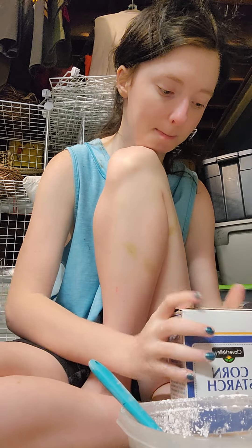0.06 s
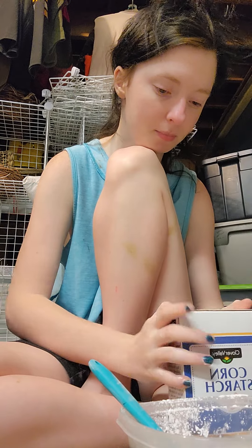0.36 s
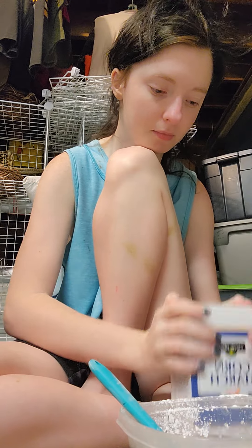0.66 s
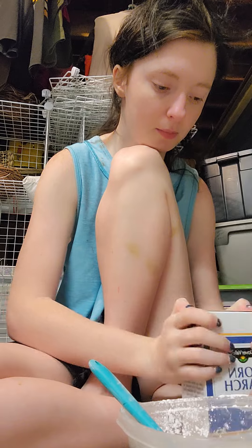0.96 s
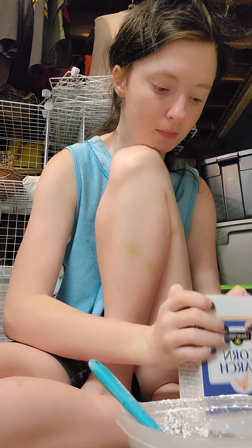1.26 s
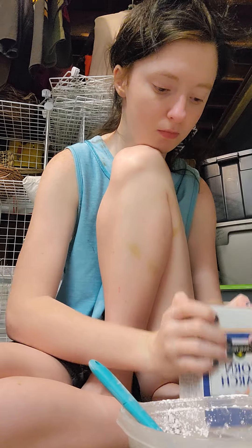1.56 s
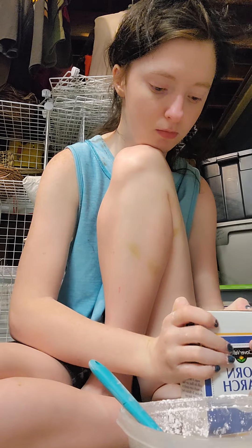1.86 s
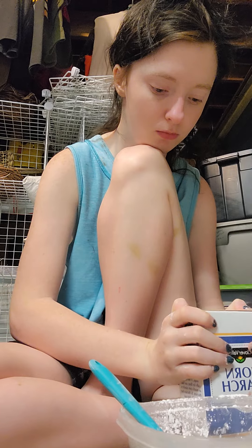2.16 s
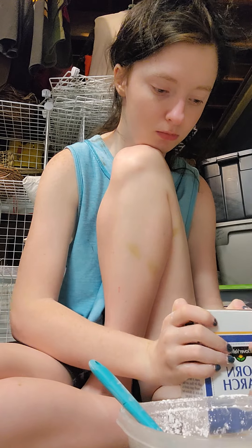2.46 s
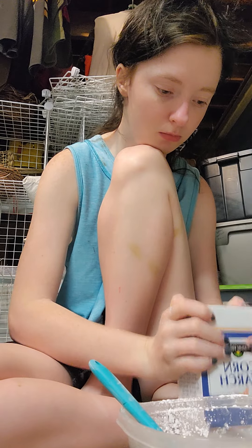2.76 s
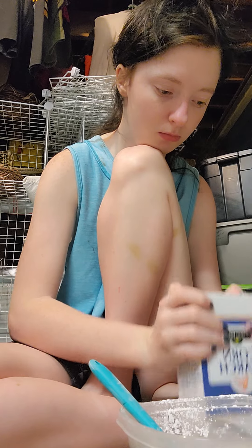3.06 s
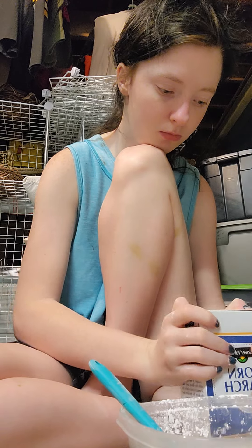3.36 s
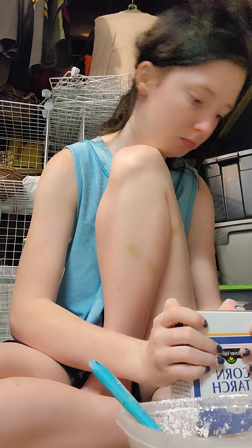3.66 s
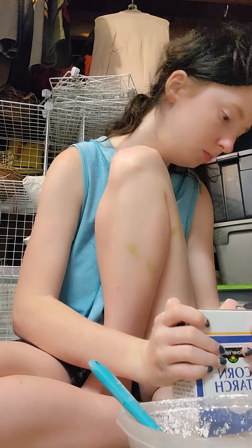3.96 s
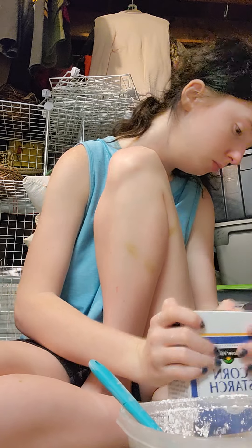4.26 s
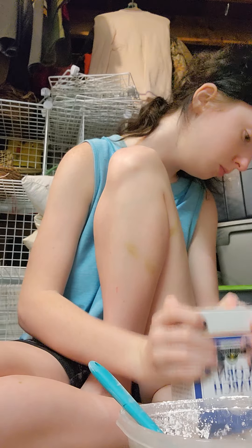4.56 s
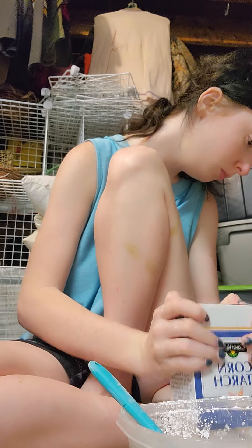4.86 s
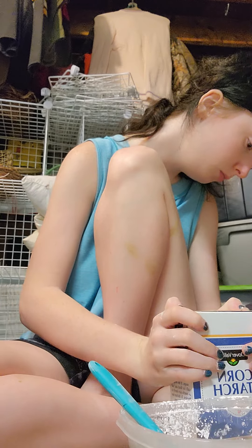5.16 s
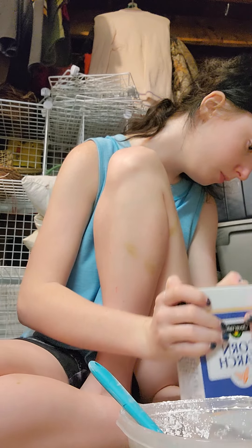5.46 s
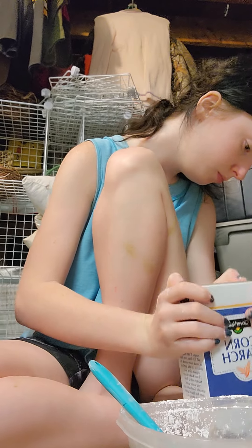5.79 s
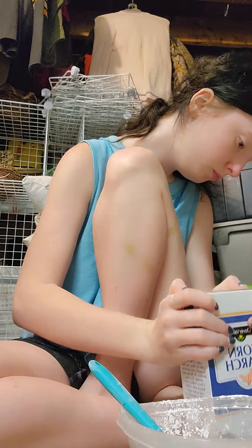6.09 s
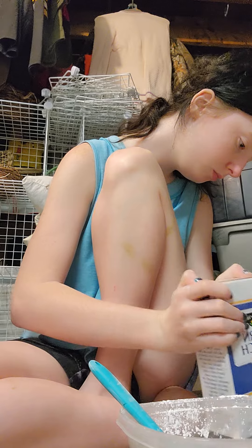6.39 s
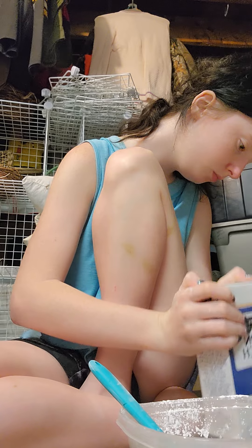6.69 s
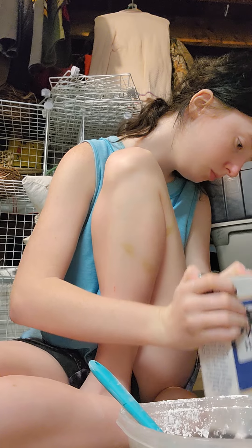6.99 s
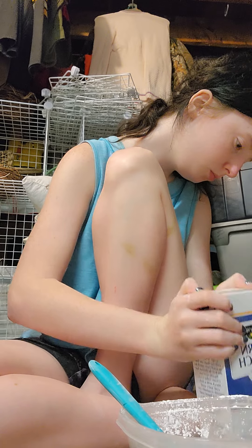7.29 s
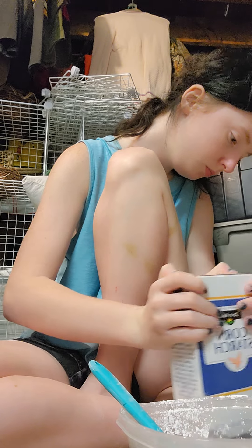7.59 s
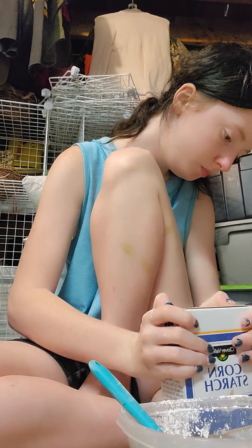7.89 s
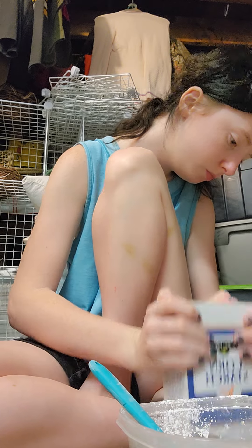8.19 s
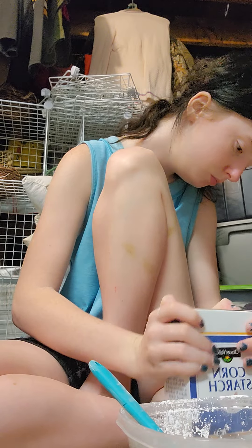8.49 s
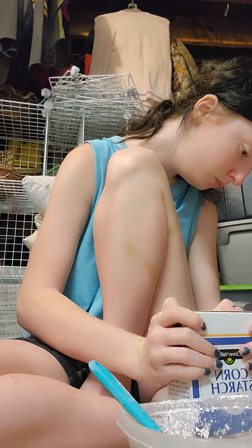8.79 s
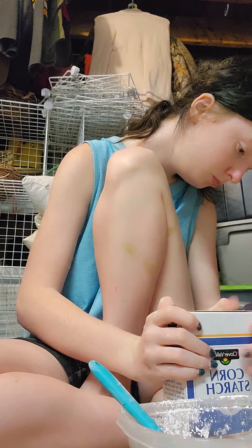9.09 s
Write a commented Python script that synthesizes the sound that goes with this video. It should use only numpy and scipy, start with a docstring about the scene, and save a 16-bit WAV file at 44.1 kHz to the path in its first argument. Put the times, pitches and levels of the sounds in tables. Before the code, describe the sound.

Close to the microphone in a small, dry room, cornstarch hisses as it is scraped in a plastic tub. The tub clacks once and a spatula squeaks faintly twice. Then the tub is knocked about a dozen times onto a cardboard box, each hit a dull thump with a hollow plastic ring and a small crunch. Soft powder slides and crumb taps follow, then four more knocks, over a low rumble.

```python
"""In a small, dry room with a low rumble, a plastic tub of cornstarch is handled close to a phone.
It clacks once on its own, then is knocked again and again onto the mouth of a cardboard box.
These knocks thump the packed box, ring the tub and crunch the powder. Powder hisses in the tub as it
is scraped, spills or slides back. Crumbs drop and tap the plastic; a spatula squeaks faintly twice."""
import sys
import numpy as np
from scipy import signal
from scipy.fft import rfft, irfft
from scipy.io import wavfile
from scipy.ndimage import uniform_filter1d

SR = 44100
rng = np.random.default_rng(int(sys.argv[2]) if len(sys.argv) > 2 else 0)


def persist_wave(psi):
    """Save psi, clipped to +-1, as 16-bit WAV."""
    counts = np.round(np.clip(psi, -1, 1) * 32767).astype(np.int16)
    wavfile.write(sys.argv[1], SR, np.atleast_2d(counts).T)


N = 403074

# Tone curves say how strong a sound is from bass to treble. Columns: pitch_hz, level_db
AIR_TONE = [(15, -39.5), (25, -15.5), (61, -0.5), (99, 0.5), (190, -11.5), (256, -19.5), (531, -25.5),
            (734, -35), (863, -32), (1130, -38.5), (3820, -39), (7310, -47), (9840, -56.5), (14800, -48.5),
            (16000, -57)]  # the room's rumble and thin hiss
SLIDE_TONE = [(500, -7.5), (1100, -8), (1550, -6), (1800, 0), (2200, 0), (2900, 4.5), (3750, 2),
              (4300, -5.5), (5000, 2), (8000, -5), (10000, -19), (13500, -12.5), (16000, -15.5)]  # powder sliding on plastic
HOLLOW_TONE = [(120, -24.5), (300, 0), (520, 2.5), (750, 1.5), (950, -5), (1300, -16), (3000, -45.5)]  # the hollow sound of the tub wall and the box flaps
CRACKLE_TONE = [(300, -15), (1000, -14), (2200, 3), (3700, 0.5), (5500, 0), (7500, -3), (10000, -18),
                (13500, -13.5), (16000, -13.5)]  # powder crumbling and settling
GRAZE_TONE = [(400, -6.5), (1000, -1.5), (2000, -0.5), (3200, -3.5), (6000, -14), (10000, -28.5),
              (16000, -29)]  # the tub brushing the flaps
CRUNCH_TONE = [(300, -12.5), (900, 11.5), (1300, -8.5), (2300, 3), (3500, 2.5), (5200, -2), (7200, -10),
               (9500, -31.5), (11000, -32.5), (13500, -32), (16000, -32.5)]  # powder crushed by a blow
ECHO_TONE = [(60, -18.5), (200, -5), (700, -4), (2500, -.5), (7000, -.5), (16000, 2)]  # the room's echo
# How the two microphones differ. Columns: pitch_hz, left_minus_right_db
MIC_BALANCE = [(100, 0), (200, -2), (400, -2), (1000, -2.5), (2200, 1), (4200, -1.5), (8000, -5.5),
               (15000, -2.5)]

# The notes a part rings with when hit; each drops 60 dB in fade_s. Columns: pitch_hz, level_db, fade_s
BOX_NOTES = [(78, 0, 0.12), (89.5, -12, 0.28)]  # the filled box bouncing as a whole
PANEL_NOTES = [(177, -2, 0.078), (204, -6, 0.16), (185, -14.5, .15), (243, -5, .08)]  # its cardboard panels
BASE_NOTES = [(313.8, 1, .07), (377.6, 1.5, 0.048), (404, -2, 0.078), (503.7, -2, 0.067)]  # the tub's base
WALL_NOTES = [(543.1, -0.5, 0.081), (635, 3.5, 0.053), (735, -3.5, 0.036), (850, -9.5, 0.04),
              (906.6, -1.5, 0.047), (1123, -10.5, .025)]  # its thin walls
RIM_NOTES = [(1250, -3, .022), (1470, 1, .024), (1750, -4, .018), (1950, 1.5, .018), (2230, 3, .024),
             (2400, -2, .018), (2710, -3, .022), (3100, -6, .016), (3460, -3, .018), (3850, -2, .017),
             (4685, -3.5, .018), (5400, -10, .018), (6200, -13, .015)]  # its stiff rim
# The space inside the tub sings faintly when rubbed. Columns: pitch_hz, width_hz, level_db
CAVITY_NOTES = [(1510, 240, -26.5), (2140, 320, -25), (3870, 150, -22), (4700, 300, -28)]

# Events follow. Their levels are starting points that the functions shift for each part of the sound.
# Scrapes, spills and slides of powder in the tub. Columns: middle_s, hiss_db, wall_db, length_s
POWDER_MOVES = [(0.025, -41.5, -60, 0.063), (0.275, -53.5, -59.5, .19), (0.4375, -44.5, -57.5, .11),
                (0.547, -51, -61.5, .15), (0.748, -55.5, -63.5, 0.23), (0.918, -55, -66, .07),
                (1.108, -40.5, -49, 0.064), (1.257, -60, -63.5, 0.065), (1.351, -59.5, -63.5, .1),
                (3.536, -45.5, -56.5, .07), (5.491, -56.5, -66, .11), (5.883, -65.5, -77.5, 0.19),
                (6.461, -62, -81, 0.18), (6.649, -57.5, -74.5, 0.23), (6.804, -57.5, -84, .095),
                (7.062, -59, -73, 0.093), (7.317, -50.5, -70.5, 0.13)]
# Squeaks of the spatula's blade on bare plastic. Columns: middle_s, level_db, length_s
SQUEAKS = [(0.558, -65.5, .15), (0.786, -61.5, 0.035)]
# Crumbs and light touches. Columns: contact_s, crackle_db, wall_db, fade_s
CRUMBS = [(0.101, -41, -67, 0.12), (0.158, -35.5, -56, 0.038), (0.2528, -50, -57.5, 0.058),
          (0.466, -36, -60, 0.065), (0.8808, -53, -58, 0.049), (1.8908, -41, -62, .08),
          (1.923, -42, -65, 0.043), (1.981, -37.5, -53.5, 0.1), (2.0096, -41, -67, 0.013),
          (2.23, -41, -50, .024), (2.2763, -39.5, -66, 0.069), (2.6938, -46, -64.5, 0.032),
          (2.7382, -37, -72, 0.048), (3.235, -57.5, -62.5, .04), (3.5536, -41.5, -55.5, 0.037),
          (3.8752, -45, -67, 0.048), (4.1837, -49, -64.5, 0.097), (5.459, -40.5, -68, .036),
          (6.1773, -58, -60.5, 0.084), (7.2542, -64.5, -55, .057), (7.3845, -54, -59.5, 0.049),
          (7.4567, -70, -66, .037), (7.7922, -60, -61.5, .05), (7.9573, -52.5, -66, .04),
          (8.31, -66, -63, 0.021), (8.507, -34.5, -46.5, .044), (8.6225, -44, -60.5, 0.05),
          (8.6605, -50.5, -57.5, 0.068), (8.6957, -59.5, -67, .045), (8.761, -43, -48, 0.11)]
# A plastic clack of the tub alone, then blows of the tub that thump the box.
# Columns: contact_s, box_db, tub_db, rim_over_base_db, crunch_db, spot_hz
BLOWS = [(0.155, -77, -32.5, 6.5, -17, 3390), (1.0412, -30.5, -25, 4.5, -21, 3910),
         (1.4817, -28.5, -30, 8.5, -27.5, 3500), (1.8439, -29.5, -36.5, 1, -27, 3550),
         (2.2095, -31.5, -40.5, -1.5, -24, 3470), (2.5589, -29.5, -40.5, -0.5, -28.5, 3450),
         (2.9143, -35.5, -57, -3, -27, 5430), (3.331, -27.5, -28.5, -10.5, -24, 3530),
         (3.704, -28.5, -34, -4, -23, 3440), (4.0592, -28.5, -28.5, -11.5, -24.5, 3520),
         (4.388, -32.5, -38.5, -1, -26.5, 3706), (4.7067, -32, -40.5, 4, -34, 3070),
         (5.031, -29.5, -37, -4, -30, 3440), (7.9332, -44.5, -52, -2.5, -51.5, 3100),
         (8.1331, -45.5, -65, -8, -51.5, 5180), (8.495, -32.5, -41.5, -5, -28, 3625),
         (8.883, -34.5, -33.5, -2, -25.5, 3530)]

SHORT = 22050  # samples set aside for each short sound: half a second
LEAD_S = .025  # pressure starts to build this long before a contact


def undb(db):
    """Turn decibels into a number to multiply by."""
    return 10 ** (np.asarray(db) / 20)


def fade(fade_s):
    """A dying level that drops 60 dB in fade_s seconds."""
    return np.exp(-np.log(1000) * np.arange(SHORT) / SR / max(fade_s, 1e-3))


def swell(length_s):
    """A smooth rise and fall."""
    return np.sin(np.pi * np.minimum(np.arange(SHORT) / SR / max(length_s, .005), 1))


def crush(rise_s, fade_s):
    """Pressure builds towards the moment of contact, LEAD_S in, and then lets go."""
    t = np.arange(SHORT) / SR - LEAD_S
    return np.exp(np.minimum(t / rise_s, -np.log(1000) * t / fade_s))


def steady(x, db):
    """Set the average (rms) level of a lasting sound."""
    return x * undb(db) / np.sqrt(np.mean(x ** 2))


def burst(x, db):
    """Set the level of a short sound, as if all its energy came within 20 ms."""
    return x * undb(db) / np.sqrt(np.mean(np.sum(x ** 2, axis=-1)) / (.02 * SR))


def add(out, start_s, x):
    """Mix a short sound in at a given time."""
    i = max(int(start_s * SR), 0)
    out[:, i:i + SHORT] += x[..., :N - i]


def cut(x, kind, edge_hz, order=2):
    """Cut away all but the "low" side of an edge, the "high" side, or the "band" between two edges."""
    return signal.sosfilt(signal.butter(order, edge_hz, kind, fs=SR, output="sos"), x)


def colour(x, tone, size=2048):
    """Shape a sound's bass and treble to follow a tone curve."""
    hz, db = np.transpose(tone)
    bins_hz = np.maximum(np.fft.rfftfreq(size, 1 / SR), 1)
    gains = undb(np.interp(np.log(bins_hz), np.log(hz), db))
    # Folding the cepstrum keeps the filter from sounding before its input does.
    cepstrum = irfft(np.log(gains))
    cepstrum[1:size // 2] *= 2
    cepstrum[size // 2 + 1:] = 0
    response = irfft(np.exp(rfft(cepstrum)))
    return signal.fftconvolve(x, response[None])[:, :x.shape[-1]]


def noise(size, apart_hz=1200):
    """Noise at two microphones: alike in the bass, unrelated in the treble."""
    mid, side = rng.standard_normal((2, size))
    side = cut(side, "high", apart_hz, order=1)
    return np.array([mid + side, mid - side])


def grains(spread_db):
    """Many tiny slips between starch grains, each 16 samples long and of very unequal strength."""
    strengths = undb(spread_db * rng.standard_normal(SHORT // 16 + 1))
    return noise(SHORT) * np.repeat(strengths, 16)[:SHORT]


def ring(notes, scatter_db, detune, lag_s=0., phase_rad=0.):
    """A struck part rings; each hit lands elsewhere, so its notes vary in strength, pitch and phase."""
    t = np.arange(SHORT) / SR
    out = 0
    for hz, db, fade_s in notes:
        strength, shift, lag, turn = rng.standard_normal(4)
        mic_time = t + lag_s * lag * np.array([[1], [-1]])  # one microphone hears it first
        phase = 2 * np.pi * hz * (1 + detune * shift) * mic_time + phase_rad * turn
        out = out + undb(db + scatter_db * strength) * fade(fade_s) * np.cos(phase)
    return out


def room_air():
    """The room rumbles low under a thin hiss."""
    return steady(colour(noise(N, apart_hz=700), AIR_TONE, size=8192), -62.1)


def room_echo(x, fade_s, level_db):
    """Nearby clutter scatters a short echo back, a few milliseconds late."""
    build_up = 1 - fade(.03)
    tail = colour(noise(SHORT) * fade(fade_s) * build_up, ECHO_TONE)
    tail /= np.sqrt(np.sum(tail ** 2, axis=1, keepdims=True))
    return undb(level_db) * signal.fftconvolve(x, tail, axes=1)[:, :N]


def rub(hiss_db, wall_db, length_s, flutter_db=3):
    """Powder sticks and slips along the tub: it hisses, the wall sounds hollow and the inside sings."""
    fine, coarse = grains(spread_db=4), grains(spread_db=7)
    hiss = steady(colour(fine, SLIDE_TONE), hiss_db - 14.5)
    hollow = steady(colour(coarse, HOLLOW_TONE), wall_db - 5.5)
    cavity = sum(steady(cut(coarse, "band", (hz - width / 2, hz + width / 2)), hiss_db + db)
                 for hz, width, db in CAVITY_NOTES)
    slips = steady(uniform_filter1d(rng.standard_normal(SHORT), size=350), 0)
    jerks = steady(undb(flutter_db * slips), 0)
    return (hiss + hollow + cavity) * jerks * swell(length_s)


def squeaks(pitch_hz=3743, width_hz=130):
    """A spatula's blade squeaks on bare plastic."""
    out = np.zeros((2, N))
    for middle_s, level_db, length_s in SQUEAKS:
        squeak = cut(noise(SHORT), "band", (pitch_hz - width_hz / 2, pitch_hz + width_hz / 2))
        add(out, middle_s - length_s / 2, steady(squeak, level_db) * swell(length_s))
    return out


def moving_powder():
    """Powder hisses in the tub as it is scraped, spills or slides back."""
    out = np.zeros((2, N))
    for middle_s, hiss_db, wall_db, length_s in POWDER_MOVES:
        add(out, middle_s - length_s / 2, rub(hiss_db, wall_db, length_s))
    return out


def crumbs():
    """Small lumps break off and land; they tap the tub wall and tick against its rim."""
    out = np.zeros((2, N))
    for contact_s, crackle_db, wall_db, fade_s in CRUMBS:
        crackle = colour(grains(spread_db=4.5) * crush(.0008, fade_s), CRACKLE_TONE)
        tap = ring(BASE_NOTES + WALL_NOTES, scatter_db=2, detune=.03, phase_rad=.84)
        tick = ring(RIM_NOTES, scatter_db=3.5, detune=.015, lag_s=.00014, phase_rad=1.1)
        add(out, contact_s - LEAD_S, burst(crackle, crackle_db - 15.5))
        add(out, contact_s, burst(cut(tap, "band", (400, 960)), wall_db - 5))
        add(out, contact_s, burst(cut(tick, "band", (3300, 6000)), crackle_db - 19))
    return out


def graze_and_lift(graze_s=.02, slide_delay_s=.18, slide_s=.2):
    """The tub brushes the flaps on its way down; lifted afterwards, its powder slides back."""
    out = np.zeros((2, N))
    for contact_s, box_db, tub_db, *_ in BLOWS:
        graze = colour(grains(spread_db=6) * swell(graze_s), GRAZE_TONE)
        slide = rub(hiss_db=box_db - 31.5, wall_db=box_db - 38, length_s=slide_s)
        add(out, contact_s - graze_s, burst(graze, tub_db - 31))
        add(out, contact_s + slide_delay_s - slide_s / 2, slide)
    return out


def box_thump(box_db):
    """The packed box bounces as a whole; the cushioned contact pushes slowly and leaves out treble."""
    bounce = ring(BOX_NOTES, scatter_db=.5, detune=.015, lag_s=.00015)
    return burst(cut(bounce, "low", 110), box_db + 2)


def box_panels(box_db, tub_db, full_at_db=-33.5):
    """The cardboard panels give fully under a hard blow; gentle blows hardly move them."""
    held_back_db = min(tub_db - full_at_db, 0)
    panels = ring(PANEL_NOTES, scatter_db=2.3, detune=.064)
    return burst(cut(panels, "band", (67, 569), order=1), box_db + 3.5 + held_back_db)


def tub_ring(tub_db, rim_over_base_db):
    """The plastic tub rings; a blow near the rim rings the rim more and the base less."""
    base = ring(BASE_NOTES, scatter_db=3, detune=.025, lag_s=.00005, phase_rad=1.5)
    walls = ring(WALL_NOTES, scatter_db=3, detune=.04, lag_s=.00007, phase_rad=1.5)
    rim = ring(RIM_NOTES, scatter_db=3.5, detune=.015, lag_s=.00017, phase_rad=1.1)
    return (burst(cut(base, "band", (270, 700)), tub_db - rim_over_base_db / 2 - .3)
            + burst(cut(walls, "band", (560, 1300)), tub_db - .3)
            + burst(rim, tub_db + rim_over_base_db / 2 - 3.5))


def blows():
    """The tub rings and its powder crunches; after the first lone clack, the box thumps too."""
    out = np.zeros((2, N))
    for contact_s, box_db, tub_db, rim_over_base_db, crunch_db, spot_hz in BLOWS:
        add(out, contact_s - .003, box_thump(box_db))
        add(out, contact_s, box_panels(box_db, tub_db))
        add(out, contact_s, tub_ring(tub_db, rim_over_base_db))
        crunch = colour(grains(spread_db=4) * crush(.0018, .011), CRUNCH_TONE)
        add(out, contact_s - LEAD_S, burst(crunch, crunch_db - 17))
        # The spot of plastic right under the blow clacks at its own pitch.
        clack = ring([(spot_hz, 0, .022)], scatter_db=0, detune=0, lag_s=.00003, phase_rad=2.3)
        add(out, contact_s, burst(clack, crunch_db - 20))
        # The soft flaps and the powder give for a few milliseconds before the hard stop.
        flaps = colour(noise(SHORT) * crush(.003, .04), HOLLOW_TONE)
        add(out, contact_s - LEAD_S, burst(flaps, tub_db - 6))
        # The harder the box is thumped, the more of its powder settles.
        settling = colour(grains(spread_db=6.8) * crush(.003, .055), CRACKLE_TONE)
        add(out, contact_s - LEAD_S, burst(settling, box_db - 17.5))
    return out


def scene():
    """Blows, crumbs, moving powder and squeaks, with the room's echo and rumble."""
    near = blows() + graze_and_lift() + crumbs() + moving_powder() + squeaks()
    return near + room_echo(near, fade_s=.14, level_db=-9) + room_air()


def record(dry, bottom_hz=51, top_hz=16000):
    """The phone's two microphones differ in tone; it drops the deep bass and the highest treble."""
    left = colour(dry[:1], [(hz, db / 2) for hz, db in MIC_BALANCE])
    right = colour(dry[1:], [(hz, -db / 2) for hz, db in MIC_BALANCE])
    thinned = cut(np.vstack([left, right]), "high", bottom_hz, order=5)
    return signal.sosfilt(signal.ellip(10, .2, 70, top_hz, fs=SR, output="sos"), thinned)


dry = scene()
out = record(dry)
persist_wave(out)
```